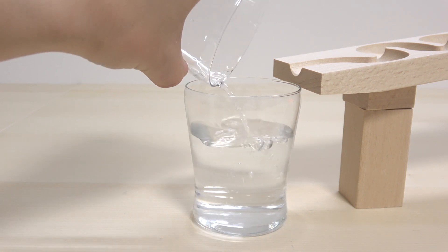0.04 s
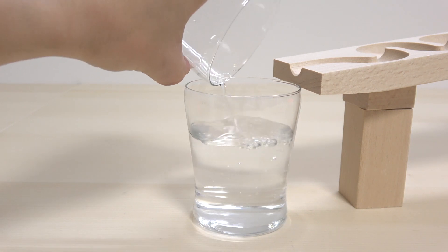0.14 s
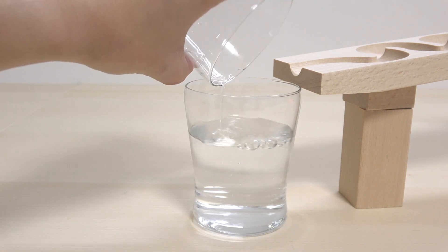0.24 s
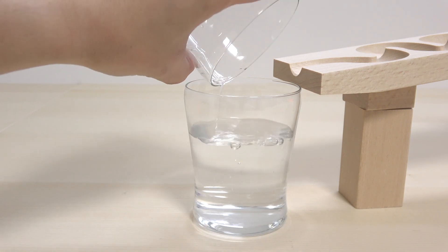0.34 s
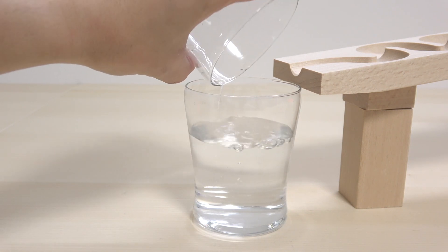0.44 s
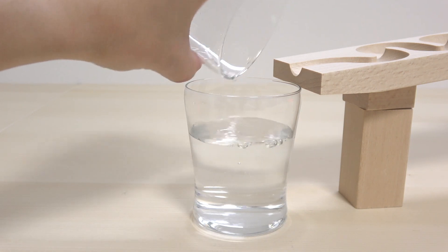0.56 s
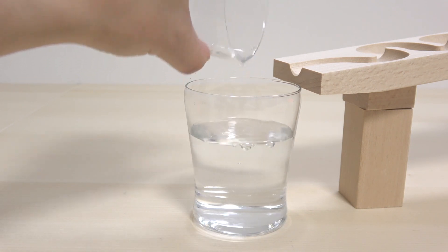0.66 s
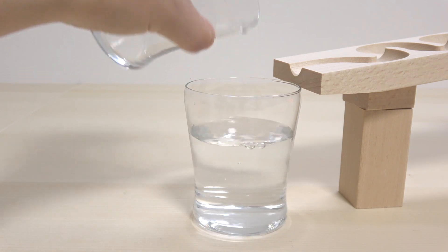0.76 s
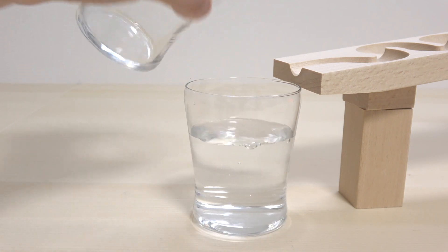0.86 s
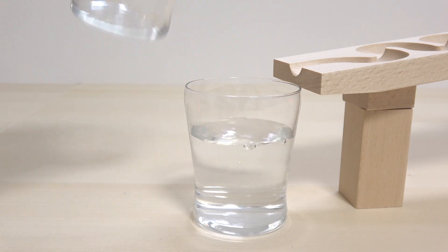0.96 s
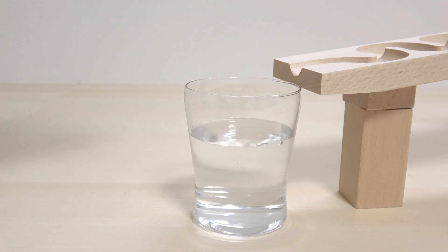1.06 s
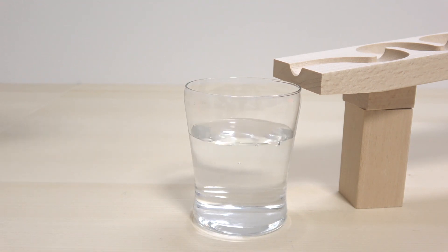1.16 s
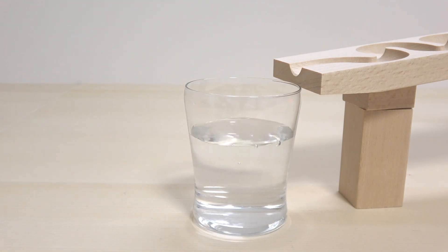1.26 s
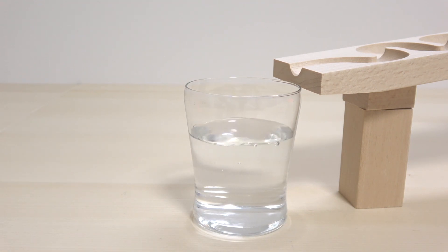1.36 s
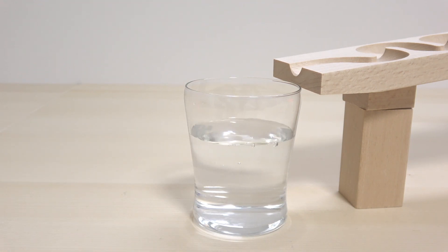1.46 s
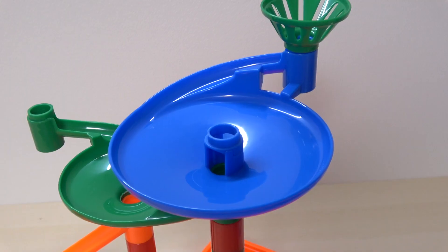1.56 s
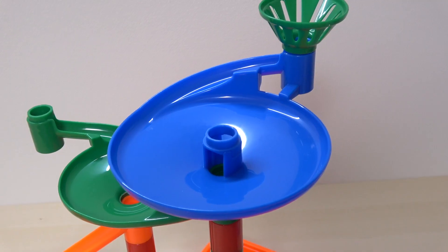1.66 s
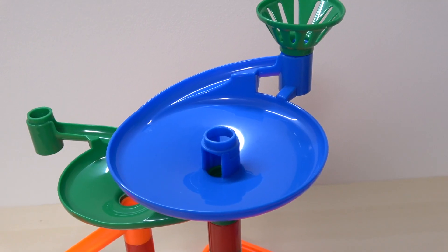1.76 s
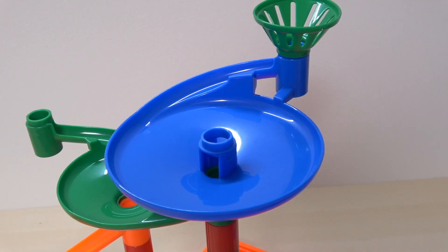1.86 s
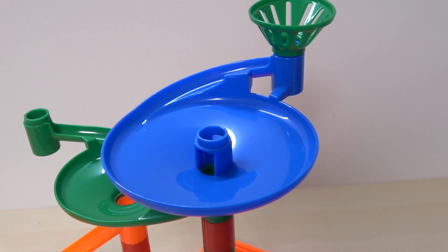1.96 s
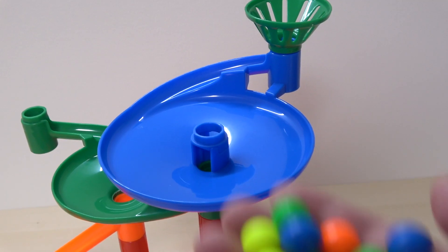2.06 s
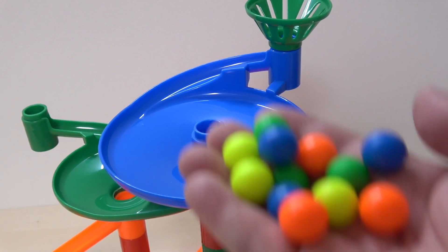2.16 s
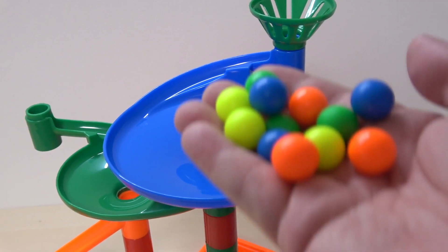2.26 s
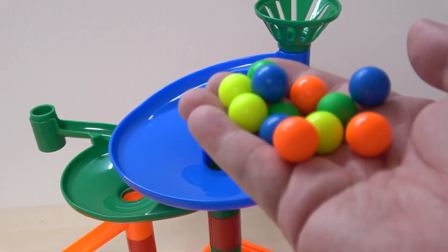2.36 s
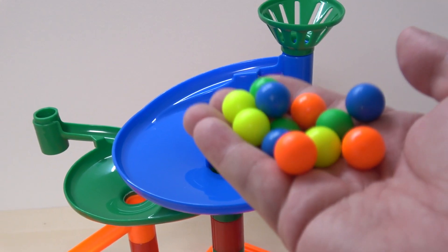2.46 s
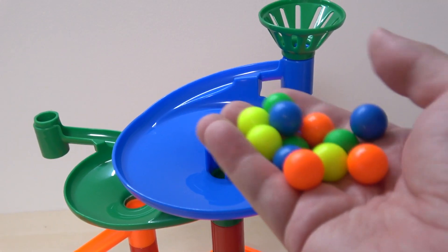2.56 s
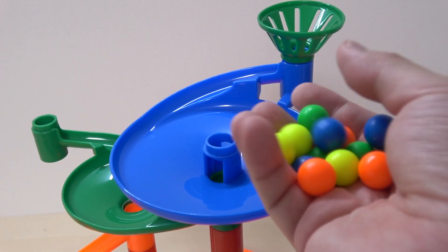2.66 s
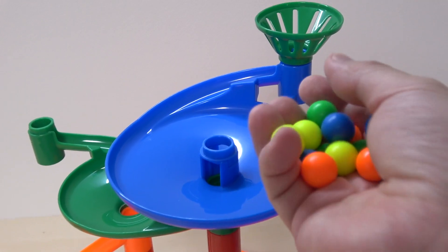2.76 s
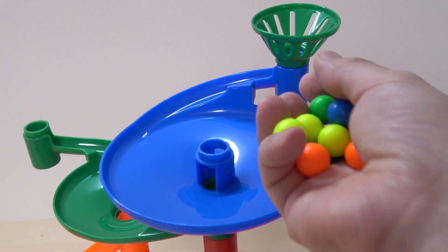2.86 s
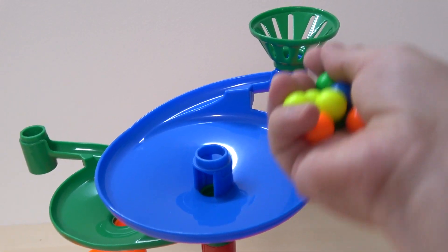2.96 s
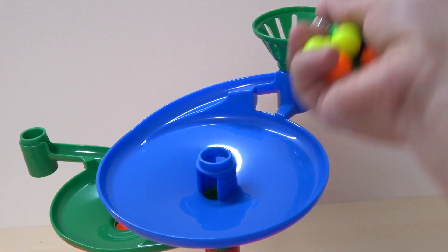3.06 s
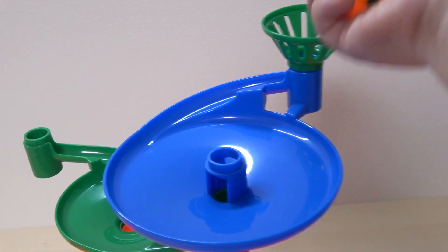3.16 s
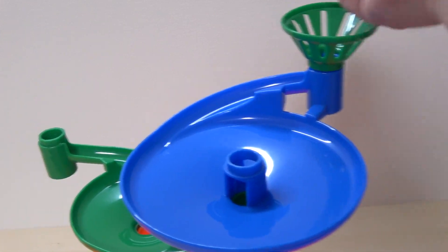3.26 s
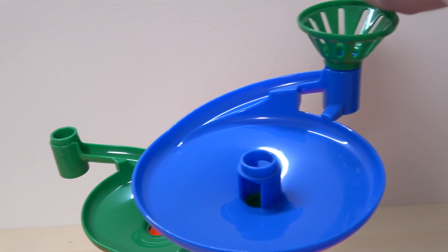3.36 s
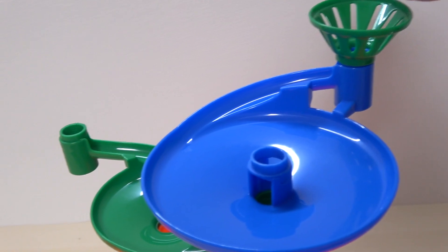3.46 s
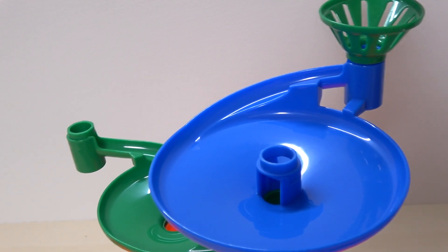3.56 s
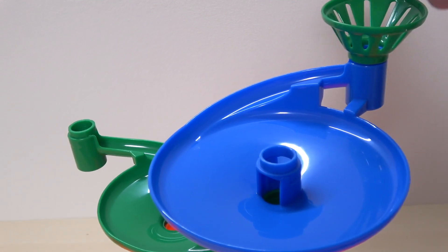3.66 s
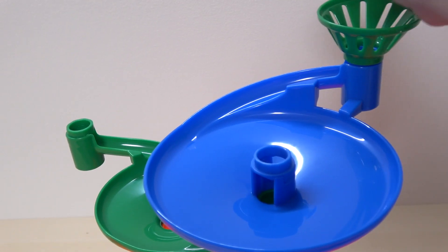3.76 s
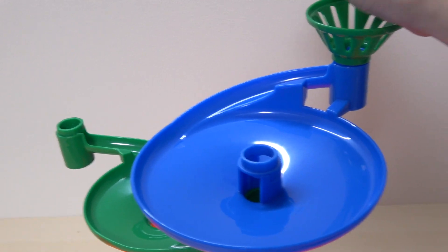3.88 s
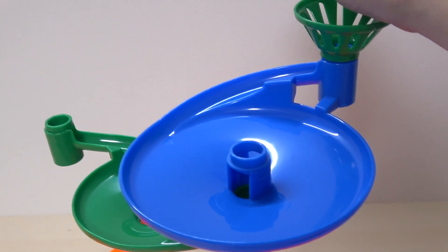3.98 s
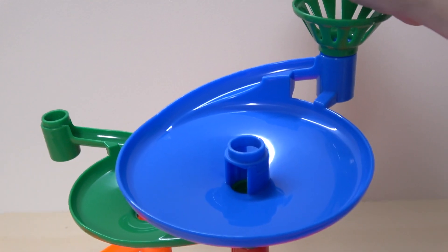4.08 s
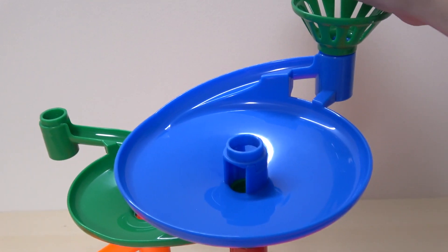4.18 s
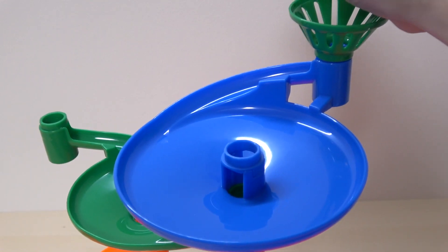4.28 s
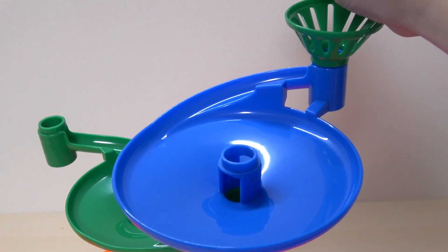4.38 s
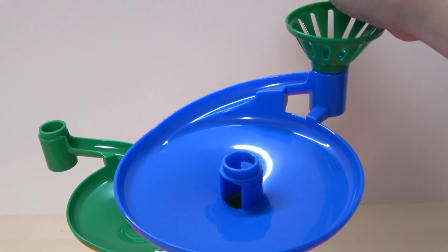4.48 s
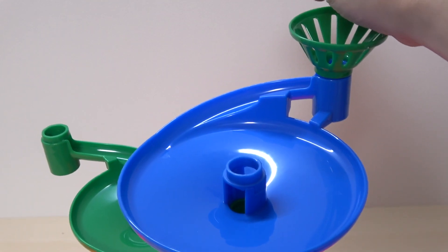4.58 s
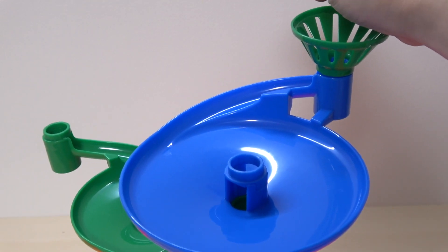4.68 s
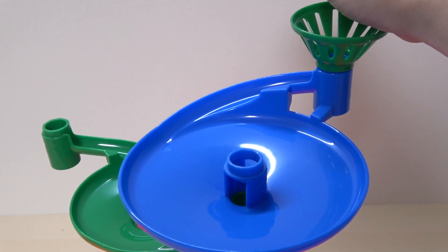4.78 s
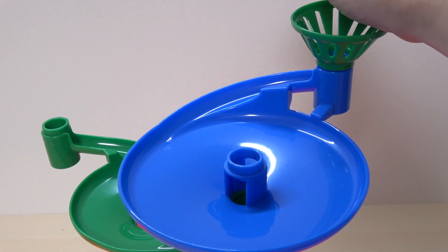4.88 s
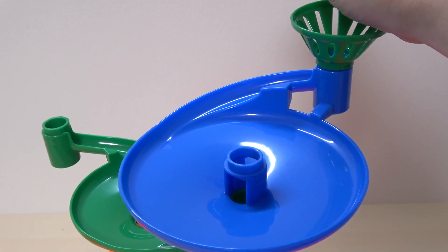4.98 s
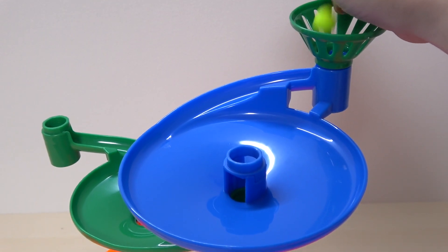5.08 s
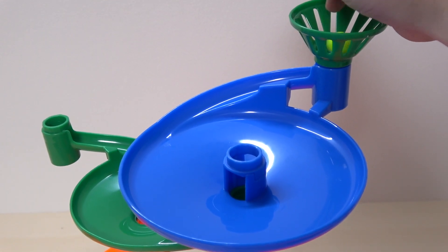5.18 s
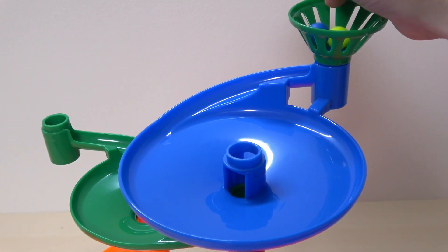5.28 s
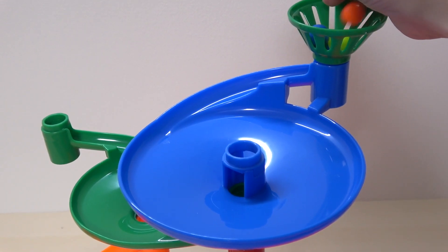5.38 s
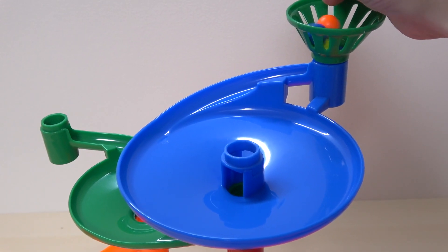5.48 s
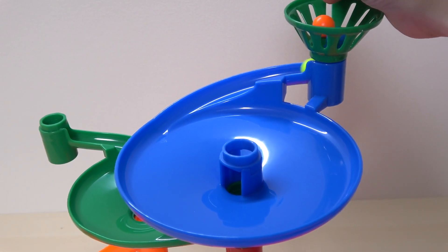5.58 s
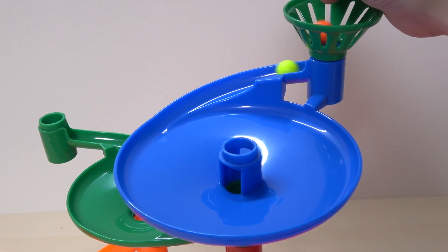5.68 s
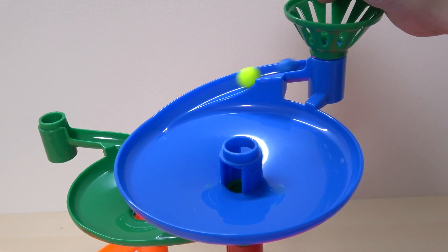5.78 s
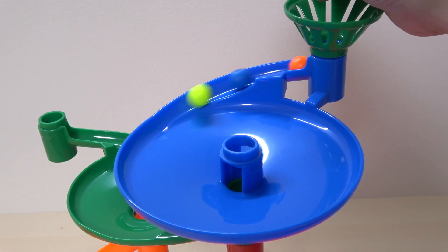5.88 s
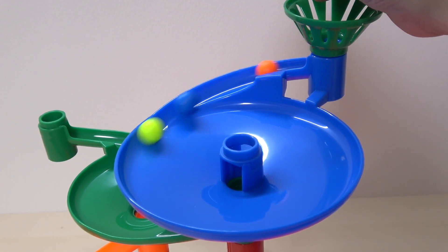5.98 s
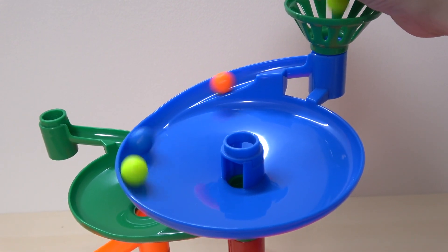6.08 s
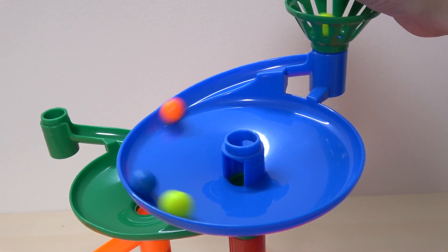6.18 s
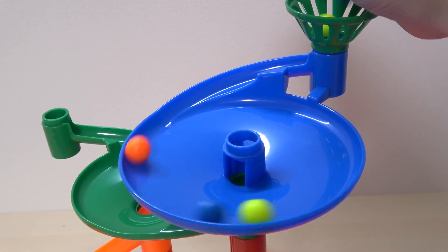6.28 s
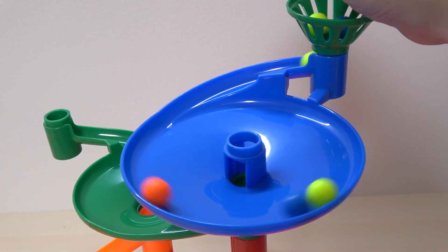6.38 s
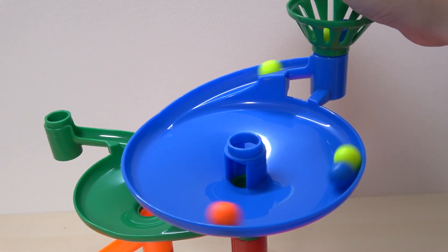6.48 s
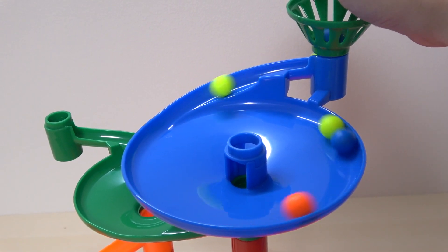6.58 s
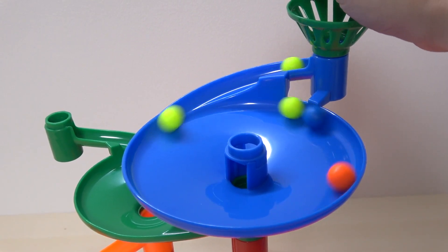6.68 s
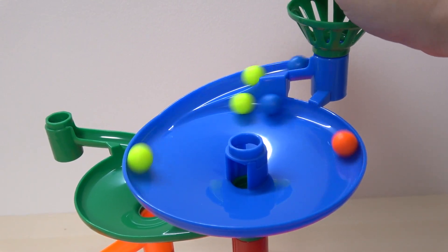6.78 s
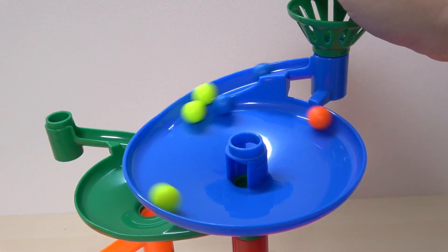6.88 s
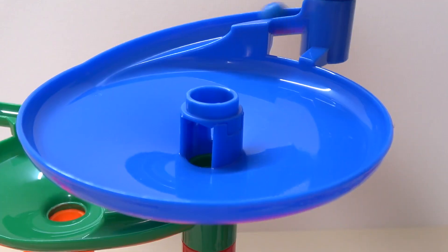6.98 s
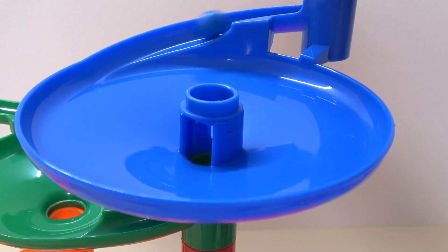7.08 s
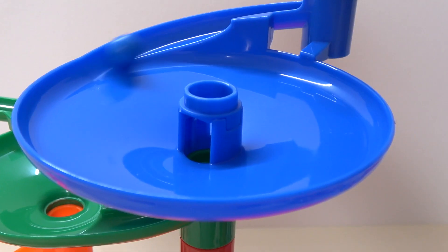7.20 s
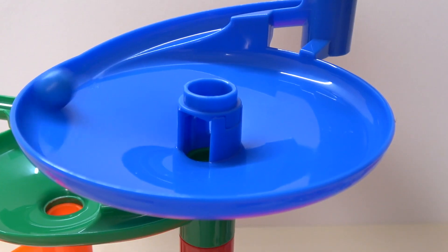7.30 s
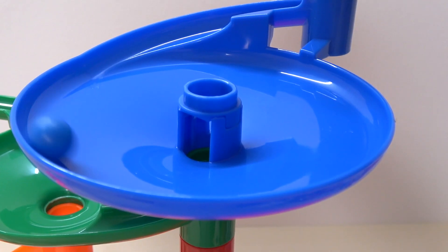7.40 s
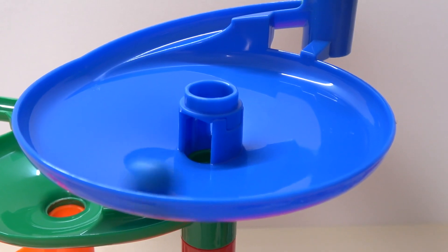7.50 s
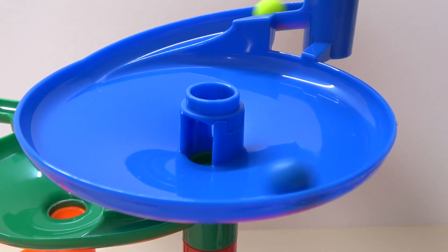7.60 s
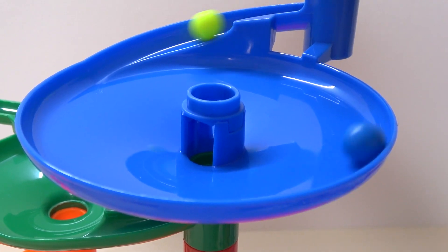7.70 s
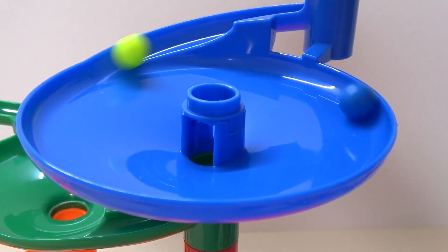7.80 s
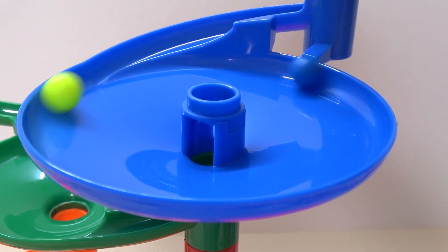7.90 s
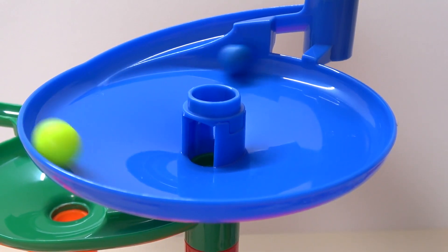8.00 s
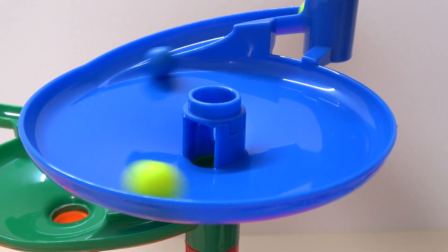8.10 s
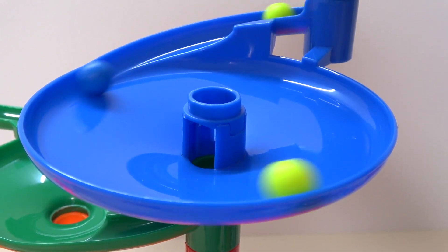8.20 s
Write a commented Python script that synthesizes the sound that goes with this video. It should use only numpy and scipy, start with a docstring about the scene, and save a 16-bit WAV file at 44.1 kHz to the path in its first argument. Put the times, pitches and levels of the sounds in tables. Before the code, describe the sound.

Last drips plink into a glass of water, then plastic balls click in a palm before clattering and rolling loudly round a plastic marble run.

```python
"""The last of some water drips into a glass: trapped bubbles ring, droplets patter, tiny bubbles burst.
Then, in a small quiet room, a low drone dies away and a handful of plastic balls click and rub in a palm.
Last, the balls drop into the funnel of a toy marble run, clatter down a chute and roll round a thin tray.
Each blow is a short burst that sets off the plastic's resonances; rolling is a stream of tiny blows.
"""
import sys
import numpy as np
from scipy import signal
from scipy.fft import rfft, irfft
from scipy.io import wavfile
from scipy.ndimage import uniform_filter1d, minimum_filter1d

SR = 44100
rng = np.random.default_rng(int(sys.argv[2]) if len(sys.argv) > 2 else 0)


def transcribe(signal):
    """Save signal, clipped to [-1, 1], as a 16-bit WAV file at the path in sys.argv[1]."""
    frames = np.atleast_2d(signal).T
    limited = np.clip(frames, -1, 1)
    pcm = np.round(limited * 32767).astype(np.int16)
    wavfile.write(sys.argv[1], SR, pcm)


N = 363825
TAPS = 16384  # length of the filters and single sounds (samples)
TIME, AGE = np.arange(N) / SR, np.arange(TAPS) / SR  # s
HZ = np.fft.rfftfreq(TAPS, 1 / SR)
RING_T60, ROOM_T60 = 0.086, 0.29  # time for plastic and room to fall by 60 dB (s)
LAG_S = .0007  # listed blows, clicks and pops sound this long after their times (s)


def amp(db):
    """Decibels to gain."""
    return 10 ** (np.asarray(db) / 20)


def evened(x):
    """Scales to an rms of one."""
    return x / np.sqrt(np.mean(x ** 2) + 1e-20)


def read(points, hz=HZ):
    """Reads a spectrum between its points, on a log-frequency axis."""
    f, value = np.transpose(points)
    return np.interp(np.log(hz + 1), np.log(f + 1), value)


def add(mix, s, sound):
    """Mixes a sound in at time s."""
    part = mix[max(round(s * SR), 0):][:len(sound)]
    part += sound[:len(part)]


def colour(x, db):
    """Filters with the given gain at each of HZ, never ahead of time, so its peaks ring on after a blow."""
    both_halves_db = np.concatenate([db, db[-2:0:-1]])
    log_gain = np.log(amp(both_halves_db))
    # the Hilbert transform finds the phase that packs the energy as early as possible
    response = np.fft.ifft(np.exp(np.conj(signal.hilbert(log_gain)))).real
    return signal.fftconvolve(x, response[:TAPS // 2])[:len(x)]


def peak(hz, width):
    """Power response of one resonance."""
    return 1 / (1 + (2 * (HZ - hz) / width) ** 2)


def dying(t60):
    """Countless modes or echoes dying together, with unit energy."""
    tail = rng.standard_normal(TAPS) * amp(-60 * AGE / t60)
    return tail / np.linalg.norm(tail)


def room(wet_db, echo=0.38):
    """Direct sound, two echoes from table and wall, and the blurred tail of the room."""
    response = amp(wet_db) * dying(ROOM_T60) + amp(wet_db - 15.0) * dying(0.15)
    response[0] += 1
    response[rng.integers(90, 150)] += echo
    response[rng.integers(200, 300)] += echo
    return response


def blow(crack=0.74, snap=0., wet_db=-4):
    """One contact: a crack, a snap, the short ring of the plastic at that spot, and the room."""
    response = dying(RING_T60) + snap * dying(0.013) + amp(wet_db) * dying(ROOM_T60)
    response[0] += crack
    return response


def bumps(per_s, spread_db, count=6):
    """A stream of small contacts of uneven size at several spots."""
    size = amp(spread_db * np.minimum(rng.exponential(1, (count, N)), 3))
    hit = rng.random((count, N)) < per_s / count / SR
    return sum(signal.oaconvolve(train, blow())[:N] for train in size * hit)


def clicks(rows, spectrum, width_hz, level_db, wet_db, steepness, narrowing=0.17):
    """Contacts only a few cycles long, each followed by the room; gentle ones are narrower in tone."""
    out = np.zeros(N)
    loudest = max(row[1] for row in rows)
    for s, db, hz in rows:
        width = width_hz * amp(narrowing * (db - loudest))
        tone_db = read(spectrum) + steepness * np.log10(peak(hz, width))
        click = colour(room(wet_db), tone_db)
        add(out, s + LAG_S, amp(db + level_db) * click / abs(click).max())
    return out


# colour of the still air round the glass and round the run: f/Hz, relative level/dB
GLASS_AIR = [(20, -16), (60, 1), (95, -11), (125, 2), (175, -8.5), (220, 2), (265, -7.5), (315, 2.5),
             (400, -9), (600, -6.5), (1000, -11.5), (1400, -23), (4000, -29.5), (6500, -28.5), (16000, -32)]
TOY_AIR = [(20, -11), (62, 9.5), (85, -6), (115, 1), (160, -5.5), (230, -3), (430, -6.5), (620, 2),
           (720, -4), (850, -1.5), (1050, -5.5), (1450, -22), (4800, -29), (6500, -26), (16000, -30)]


def air(glass_db=-56.5, toy_db=-55.5):
    """Steady noise of the still air, a little different in the two places."""
    moved = np.clip((TIME - 1.56) / 0.033, 0, 1)
    by_glass = amp(glass_db) * evened(colour(rng.standard_normal(N), read(GLASS_AIR)))
    by_toy = amp(toy_db) * evened(colour(rng.standard_normal(N), read(TOY_AIR)))
    return np.sqrt(1 - moved) * by_glass + np.sqrt(moved) * by_toy


# air bubbles trapped by the last drips: t/s, starting f/Hz, peak level/dB, time to fall by 60 dB/s
BUBBLES = [(0.0, 1410, -35.5, 0.02), (0.016, 1234, -41, 0.14), (.028, 2970, -41, .05),
           (.044, 3100, -36, 0.024), (0.045, 1216, -43, 0.11), (0.07, 1440, -40, 0.058),
           (.071, 2880, -42, .025), (.072, 2310, -45.5, .09), (0.079, 1510, -35, 0.018),
           (.362, 3700, -58, 0.063), (0.363, 3330, -55, 0.022), (.388, 4900, -57, .02)]


def drips(rise=1.35, wet_db=-7):
    """Each trapped bubble rings and rises in pitch as it nears the surface."""
    out = np.zeros(N)
    for s, hz, db, t60 in BUBBLES:
        tone = np.sin(2 * np.pi * hz * AGE * (1 + rise * AGE))
        ring = tone * amp(-60 * AGE / t60) * (1 - np.exp(-AGE / 0.00024))  # quick, soft start
        heard = signal.fftconvolve(ring, room(wet_db, echo=0.13))[:TAPS]
        add(out, s, amp(db) * heard / abs(heard).max())
    return out


# colour of the droplets and spray: f/Hz, relative level/dB
SPLASH = [(200, -5), (900, -12), (1400, 0), (2000, -12), (3000, -13), (3900, -16), (6000, -10), (8000, -20),
          (11000, -16), (16000, -29)]


def trickle(stream_db=-48, stream_fade_db_per_s=105, spray_db=-66, spray_fade_db_per_s=24):
    """The thin stream breaks into droplets and fades fast; a fine spray lingers on the water."""
    stream = amp(stream_db - stream_fade_db_per_s * TIME)
    spray = amp(spray_db - spray_fade_db_per_s * TIME)
    return evened(colour(bumps(400, 5.6), read(SPLASH))) * (stream + spray)


# the clearest tiny bubbles bursting: t/s, level/dB (before level_db), f/Hz
POPS = [(0.0613, -36, 5740), (0.0707, -34.5, 5770), (0.2074, -44, 5800), (0.2568, -42, 7350),
        (0.2923, -41, 5500), (0.3267, -41, 5450), (0.3885, -43, 4780), (0.4564, -47, 8300),
        (0.619, -42, 7040), (0.655, -38, 7600), (0.7756, -46, 8720), (0.8525, -43, 6620),
        (1.0883, -38.5, 9000)]
# colour of the bursts: f/Hz, relative level/dB
POP_COLOUR = [(500, -30), (2500, -3), (5500, 4), (11000, 2), (16000, -2)]


def pops():
    """Tiny bubbles burst, each a click only a few cycles long."""
    return clicks(POPS, POP_COLOUR, width_hz=1600, level_db=-1.5, wet_db=-3, steepness=8.1)


def hum(hz, width_hz):
    """A low, narrow, wavering tone, made from filtered noise."""
    return evened(colour(rng.standard_normal(N), 20 * np.log10(peak(hz, width_hz))))


def low_sounds(drone_db=-57, drone_start_s=1.51, drone_rise_s=.04, drone_fade_db_per_s=11, nudge_db=-56):
    """A low drone that dies away, and a soft nudge of the hand on the funnel."""
    age = np.maximum(TIME - drone_start_s, 0)
    drone = hum(108, 7) * np.minimum(age / drone_rise_s, 1) * amp(drone_db - drone_fade_db_per_s * age)
    nudge = hum(317, 50) * amp(nudge_db) * np.exp(-((TIME - 3.65) / 0.081) ** 2)
    return drone + nudge


# balls clicking together in the hand: t/s, peak level/dB, f/Hz
HAND_CLICKS = [(2.2402, -46, 3220), (2.289, -55, 3330), (2.5952, -31, 3500), (2.6762, -21, 5130),
               (2.6837, -19.5, 3680), (2.7058, -12, 6800), (2.7212, -14.5, 4200), (2.7314, -20.5, 3600),
               (2.808, -31, 2530), (2.8254, -29, 2200), (2.852, -16, 4570), (2.9464, -11.5, 3900),
               (2.9864, -6, 5400), (3.1001, -25, 2640), (3.1141, -7, 6000), (3.1895, -17, 4600),
               (3.3642, -42, 1550), (3.4875, -47, 2880), (3.674, -44.5, 2650), (3.7189, -43, 2780),
               (5.0436, -51, 2600)]
# colour of ball against ball: f/Hz, relative level/dB
BALL_COLOUR = [(200, -38), (800, -9.5), (1400, -2.5), (3000, -0.5), (6200, -2), (9000, -8), (12000, -18),
               (16000, -25)]
REBOUND_S, REBOUND_DB, REBOUND_PITCH = 0.0084, -13, 0.67  # typical delay (s), level (dB), share of pitch


def handful():
    """Balls click and rub in the hand; each click has a softer, duller rebound."""
    delays = REBOUND_S * rng.uniform(.5, 1.4, len(HAND_CLICKS))
    rebounds = [(s + delay, db + REBOUND_DB, hz * REBOUND_PITCH)
                for (s, db, hz), delay in zip(HAND_CLICKS, delays)]
    clicking = clicks(HAND_CLICKS + rebounds, BALL_COLOUR, width_hz=2040, level_db=0.0, wet_db=-4.5,
                      steepness=10.2, narrowing=0.23)
    return clicking + rubs()


# balls rubbing in the palm, and in the last row as they leave the hand:
# middle t/s, spread of the swell/s, level/dB (before the room)
RUBS = [(2.657, 0.016, -56), (2.832, 0.0046, -43), (2.915, 0.0076, -54), (2.961, .008, -46),
        (2.985, 0.0041, -37), (3.118, 0.012, -40.5), (3.378, 0.019, -63), (3.6, 0.1, -76.5),
        (5.141, 0.006, -28.5)]


def rubs(hz=2600, width_hz=1500):
    """Dense tiny slips as balls rub in the palm, and once as they leave the hand: noise in short swells."""
    level = sum(amp(db) * np.exp(-((TIME - s) / length) ** 2 / 2) for s, length, db in RUBS)
    tone_db = read(BALL_COLOUR) + 10 * np.log10(peak(hz, width_hz))
    slips = level * evened(colour(rng.standard_normal(N), tone_db))
    return signal.oaconvolve(slips, room(-1))[:N]


# resonances of the plastic run, and two dips (negative height): f/Hz, width/Hz, height/dB
TRAY_PEAKS_AND_DIPS = [(111.4, 13, 15), (151, 6.9, 12), (217.8, 5, 16.5), (317.3, 7, 14), (421, 37, 8.5),
                       (537.2, 9.2, 13.5), (618, 30, 12.5), (740.3, 7.3, 18.5), (776, 6.7, 16.5),
                       (1024, 26, 5), (1099, 12, 14), (1234, 44, 9), (1272, 28, 13.5), (1337, 66, 7),
                       (1592, 4.7, 12), (1602, 9.9, 16.5), (1660, 10.4, 14), (1818, 34, 8), (1850, 18, 8),
                       (2252, 7.4, 12.5), (2475, 49, 9), (2898, 64, 7), (3212, 19, 10.5), (3495, 33, 7.5),
                       (3770, 7, 10.5), (3630, 23, -18), (4200, 48, -9), (5960, 410, 5.5), (7190, 410, 2.5)]


def tray_resonance(ripple_db=1.0):
    """The resonances of the run, two dips, and a ripple of crowded weak modes in the treble, in dB."""
    shape = sum((amp(db) ** 2 - 1) * peak(hz, width) for hz, width, db in TRAY_PEAKS_AND_DIPS)
    weak = evened(signal.fftconvolve(rng.standard_normal(len(HZ)), np.hanning(45), "same"))
    return 10 * np.log10(np.maximum(1 + shape, .1)) + ripple_db * weak * np.clip(HZ / 4000, 0, 1)


def resonate(x, hz, width):
    """A resonance that follows the curve hz: shift that note to 0 Hz, smooth, and shift back."""
    turn, r = np.exp(2j * np.pi * np.cumsum(hz) / SR), np.exp(-np.pi * width / SR)
    return 2 * (turn * signal.lfilter([1 - r], [1, -r], x / turn + 1e-18)).real


def wandering(hz, swing_hz, per_s):
    """A note that drifts as the balls move to new places on the tray."""
    places = 2 * rng.random(size=256) - 1
    return hz + swing_hz * np.interp(TIME * per_s, np.arange(len(places)), places)


def circling(x, delay_s=0.00337, swing=0.338, turns_per_s=1.05, echo=0.16):
    """The path of the echo from the table lengthens and shortens as the balls go round."""
    delay = delay_s * (1 - swing * np.cos(2 * np.pi * turns_per_s * (TIME - 7.1)))
    return evened(x + echo * np.interp(TIME - delay, TIME, x))


def dulled(x, share, corner_hz=1750):
    """Takes away a share of the treble, as a slow ball does."""
    hz = np.fft.rfftfreq(N, 1 / SR)
    treble = irfft(rfft(x) * hz ** 8 / (hz ** 8 + corner_hz ** 8), N)
    return x - share * treble


def dips(dip_s=0.0044, depth=0.64):
    """The rolling dips for some ms just before each drop or ball-on-ball hit, as under a look-ahead limiter."""
    level = np.ones(N)
    for s, *_ in DROPS + COLLISIONS:
        add(level, s - 0.81 * dip_s, -depth * np.hanning(round(2.1 * dip_s * SR)))
    return np.clip(level, 0, 1)


# balls rolling round the tray: t/s, level/dB (shared by the layers), note of the tray under them f/Hz
ROLLING = [(5.14, -17.5, 1490), (5.19, -28.5, 1410), (5.7, -28.5, 1284), (5.91, -25, 1326),
           (6.06, -23, 1303), (6.2, -20.5, 1277), (6.4, -23, 1306), (6.59, -21.5, 1280),
           (6.78, -22.5, 1310), (6.95, -19.5, 1330), (7.14, -34.5, 1190), (7.21, -26.5, 1290),
           (7.38, -27, 1250), (7.68, -27, 1355), (7.84, -21.5, 1306), (8.0, -28.5, 1280),
           (8.14, -26.5, 1240), (8.25, -24.5, 1350)]
# colour under the resonances for soft rolling contact, and for a hard blow: f/Hz, relative level/dB
SOFT = [(30, -48), (100, -38.5), (250, -14), (400, -6), (650, -10.5), (900, -3), (1250, -4), (1500, -13),
        (2100, -4.5), (3000, -6), (5000, -25.5), (9000, -30), (16000, -102)]
HARD = [(30, -22), (70, -13.5), (250, -9.5), (450, -5), (880, -7), (1250, -7), (2050, -6.5), (3000, -7),
        (4300, -2.5), (5400, -10.5), (9300, -22), (11000, -28), (12600, -27.5), (16000, -46.5)]
HOLLOW_HZ = 728  # middle of a lower, hollow note of the tray


def rolling(tray_db, roll_db=-2.5, sing_db=-3, hollow_db=-14.5, chatter_db=-11.0, chatter_growth=1.63,
            dulling=0.51):
    """Balls rumble on the tray, which sings under them; fast ones are brighter and chatter on its rim."""
    s, *controls = np.transpose(ROLLING)
    level_db, sing_hz = (np.interp(TIME, s, control) for control in controls)
    slowed_db = level_db - level_db.max()  # 0 at the loudest, falling as the balls slow
    released = np.clip((TIME - 5.138) / .006, 0, 1)

    rumble = circling(colour(bumps(450, 3.0), read(SOFT) + tray_db))
    rumble = dulled(rumble, 1 - amp(dulling * slowed_db))
    # each note passes its resonance twice, which makes it purer
    sing_hz = wandering(sing_hz, swing_hz=55, per_s=24)
    sing = evened(resonate(resonate(bumps(500, 2.4), sing_hz, 200), sing_hz, 200))
    hollow_hz = wandering(HOLLOW_HZ, swing_hz=62.6, per_s=11)
    hollow = evened(resonate(resonate(bumps(350, 1.53), hollow_hz, 82), hollow_hz, 82))
    soft = (amp(roll_db) * rumble + amp(sing_db) * sing + amp(hollow_db) * hollow) * amp(level_db)

    rim_db = chatter_db + level_db.max() + chatter_growth * slowed_db
    chatter = evened(colour(bumps(160, 0.7), read(HARD) + tray_db)) * amp(rim_db)
    return released * dips() * (soft + chatter)


def strike(tray_db, levels_db, note_hz, note_db, note_width_hz, snap, crack_db, body_hz=1230,
           body_spread=0.54, body_ring_db=6.5):
    """One blow rings the run, at given levels of thud, body, clack and tick; every spot has its own notes."""
    # four bands from low to high: thud, body, clack, tick
    below = [1 / (1 + (HZ / hz) ** 8) for hz in (950, 2050, 6500)]
    zones = np.diff([0 * HZ, *below, 0 * HZ + 1], axis=0)
    spot_body_hz = body_hz * (1 + body_spread * rng.random() ** 2)
    notes_db = body_ring_db * peak(spot_body_hz, 310) + note_db * peak(note_hz, note_width_hz)
    # modes with a node (a point at rest) at the spot stay quiet
    nodes_db = 1.56 * np.cos(2 * np.pi * (np.sqrt(HZ) / rng.uniform(3.3, 6.82) + rng.random()))
    shell_db = read(HARD) + tray_db + notes_db + nodes_db
    contact = blow(crack=0.32, snap=snap)
    # what each band holds in its first 20 ms sets the gain it needs
    held = irfft(rfft(colour(contact, shell_db)) * zones)[:, :SR // 50].std(axis=1)
    tone_db = shell_db + 20 * np.log10((amp(levels_db) / held) @ zones)
    sound = colour(contact, tone_db)
    # the first crack comes straight from the point of contact
    crack = colour(signal.unit_impulse(1024), tone_db - 14 * below[1])
    add(sound, 0, amp(crack_db) * crack / abs(crack).max())
    return sound


# balls dropped into the funnel, which then swirl over its ribs:
# t/s, level/dB, clack relative level/dB, clack f/Hz, swirl level/dB
DROPS = [(5.141, -18.5, 5.5, 2900, -18.5), (5.1943, -26.5, -16, 6400, -43), (5.3005, -26, 12.5, 3250, -12),
         (5.3134, -17.5, -1, 4470, -26), (5.4176, -18, -9.5, 5400, -46)]


def drops(tray_db, thud_db=-2.5, body_db=0.0, tick_db=-1, crack_db=-1):
    """A falling ball shakes the whole tower: a deep thud under a hard tick."""
    out = np.zeros(N)
    for s, db, clack, hz, _ in DROPS:
        levels_db = db + np.array([thud_db, body_db, clack, tick_db])
        hit = strike(tray_db, levels_db, hz, note_db=4.5, note_width_hz=380, snap=0.67,
                     crack_db=db + crack_db, body_hz=1530)
        add(out, s + LAG_S, hit)
    return out


# notes of the funnel's ribs: f/Hz, width/Hz (before the squaring below), level/dB (before summing)
FUNNEL_MODES = [(1586, 94, -2), (1690, 52, -9), (1867, 130, -3)]
SWIRL_RISE_S, SWIRL_FADE_DB_PER_S = 0.0038, 224


def funnel():
    """The ribs of the funnel ring as each dropped ball swirls over them and sinks."""
    ribs = sum(amp(db) * peak(hz, width) for hz, width, db in FUNNEL_MODES)
    swirl = np.zeros(N)
    for s, *_, db in DROPS:
        add(swirl, s, np.minimum(AGE / SWIRL_RISE_S, 1) * amp(db - SWIRL_FADE_DB_PER_S * AGE))
    # 20 log10 of a power response squares it, so the notes get narrower
    return evened(colour(bumps(400, 2.2), 20 * np.log10(ribs))) * swirl


# spells of lighter bounces as balls rattle down the chute:
# start t/s, length/s, middle level/dB, body relative level/dB (before body_db), middle clack f/Hz
RATTLES = [(5.21, .09, -31.5, 0, 3830), (5.321, 0.059, -23.5, -4.5, 3250), (5.447, .1, -27, -3, 3540),
           (5.562, .17, -22, -5, 3900), (5.745, 0.14, -16.5, -10, 3850), (6.161, 0.17, -27, 0, 3470),
           (6.355, .07, -15.5, -3.5, 4800), (6.432, .06, -22, -5.5, 4030), (6.491, 0.13, -28.5, -4, 3180),
           (6.619, 0.16, -16, -6.5, 4370), (6.964, .1, -25, -13, 2700), (7.437, 0.061, -14.5, -7, 3250),
           (7.499, 0.069, -22.5, -10, 3300), (7.845, .13, -28, 1.5, 3100), (8.023, .06, -22, -2, 3330),
           (8.113, .06, -19.5, -5, 3620)]
BOUNCE_S, BOUNCE_SPREAD_DB = .012, 2.2  # mean time between bounces (s), spread of their strength (dB)
NOTE_SPREAD = .25  # how far the clack note differs from spot to spot (share)


def rattles(tray_db, thud_db=-15, thud_follows=0.47, body_db=-2.0, clack_db=-7, tick_db=-21,
            tick_db_per_octave=10, crack_db=-2, count=3):
    """A ball bounces unevenly between a few spots; spells with a higher clack have a harder tick."""
    out = np.zeros(N)
    for start, length, db, body, note_hz in RATTLES:
        tick = tick_db + tick_db_per_octave * np.log2(note_hz / 3700)
        levels_db = np.array([thud_db + thud_follows * body, body + body_db, clack_db, tick])
        spot_notes_hz = note_hz * (1 + NOTE_SPREAD * (2 * rng.random(count) - 1))
        spots = [strike(tray_db, levels_db, hz, note_db=6.5, note_width_hz=290, snap=0.71,
                        crack_db=crack_db) for hz in spot_notes_hz]
        delays = BOUNCE_S * (np.arange(32) + rng.random(size=32))
        sizes = amp(db + BOUNCE_SPREAD_DB * rng.standard_normal(len(delays)))
        for k, delay in enumerate(delays[delays < length]):
            add(out, start + delay, sizes[k] * spots[k % count])
    return out


# single knocks against the walls of chute and tray, from loud clacks to faint lone taps:
# t/s, level/dB, body relative level/dB, tick relative level/dB (before tick_db), clack f/Hz
KNOCKS = [(5.2153, -19.5, -11, -14, 3970), (5.243, -25.5, -4, -26, 3840), (5.352, -18, -9.5, -23, 3550),
          (5.4465, -15, -3, -11.5, 4130), (5.496, -21, -5, -24, 3450), (5.5287, -16.5, -3.5, -20, 3470),
          (5.5571, -11.5, -8, -20, 4350), (5.5897, -18.5, -4.5, -16, 4300), (5.6165, -7, -13, -16.5, 4130),
          (5.726, -7, -9, -11.5, 4500), (5.7645, -10.5, -9, -21, 3900), (5.8229, -14.5, -10, -17, 3750),
          (5.8729, -14, -21, -26, 4670), (5.9, -13.5, -29, -16.5, 2440), (5.9391, -26, -5, -22, 2220),
          (6.2043, -19.5, 2.5, -10.5, 3800), (6.2767, -18, -7, -18, 3400), (6.3111, -20, -6, -19, 2890),
          (6.3758, -13.5, -19, -22, 4870), (6.3985, -19, -1.5, -14, 3440), (6.4167, -16.5, -7, -19, 4640),
          (6.4338, -13.5, -18, -9.5, 2240), (6.462, -19.5, -6.5, -10, 2260), (6.5829, -19, -3, -20, 3440),
          (6.611, -14, -9, -12, 4020), (6.6258, -18, -5.5, -24, 3150), (6.6607, -8.5, -7, -9, 3350),
          (6.7033, -9.5, -7.5, -11.5, 4480), (6.7715, -10, -8.5, -11.5, 2330),
          (6.998, -18.5, -5.5, -12, 3020), (7.032, -19, -9, -12.5, 2410), (7.0592, -17.5, -9, -22, 2400),
          (7.2813, -34.5, -9, -17, 2800), (7.32, -35, 1.5, -19, 2600), (7.382, -40, -6, -11, 2310),
          (7.45, -11, -14, -15.5, 3200), (7.4839, -9, -13, -17.5, 3540), (7.5243, -19.5, -7.5, -28, 4170),
          (7.5715, -11, -15, -19, 3320), (7.5971, -17.5, -15, -20, 3240), (7.8613, -12.5, -14, -16, 3580),
          (7.878, -15.5, -20, -17, 3160), (7.9138, -20, -5, -13, 3470), (8.0023, -20, -2.5, -20, 3200),
          (8.02, -13, -7, -20, 3340), (8.078, -18, -7, -19, 3360), (8.1282, -16.5, -16, -18, 4060),
          (8.175, -17, -12, -18, 4270)]


def knocks(tray_db, thud_db=-15, thud_follows=.45, clack_db=-5, tick_db=-1.5, crack_db=0, hard_db=-8,
           soft_db=-24):
    """Ball on wall: a clack, with more body and thud where the plastic gives, more snap where it is stiff."""
    out = np.zeros(N)
    for s, db, body, tick, hz in KNOCKS:
        hardness = np.interp(tick, [soft_db, hard_db], [0, 1])
        levels_db = db + np.array([thud_db + thud_follows * body, body, clack_db, tick + tick_db])
        hit = strike(tray_db, levels_db, hz, note_db=5.5 + 3.6 * hardness, note_width_hz=840,
                     snap=.35 + .5 * hardness, crack_db=db + crack_db)
        add(out, s + LAG_S, hit)
    return out


# balls running into each other on the run, with a bright ring: t/s, level/dB, f/Hz
COLLISIONS = [(6.1449, -14, 4880), (6.345, -24, 5060), (6.354, -18, 5600), (6.942, -30.5, 5370),
              (7.181, -33.5, 3350), (7.4322, -18.5, 4540), (7.804, -14, 4800), (8.111, -20.5, 5000)]


def collisions(tray_db, thud_db=-19, body_db=-7, clack_db=-5.5, tick_db=-8.0, crack_db=3):
    """Ball on ball: a hard tick and a narrow, bright ring, with little weight."""
    out = np.zeros(N)
    for s, db, hz in COLLISIONS:
        levels_db = db + np.array([thud_db, body_db, clack_db, tick_db])
        hit = strike(tray_db, levels_db, hz, note_db=12.5, note_width_hz=240, snap=0.99,
                     crack_db=db + crack_db)
        add(out, s + LAG_S, hit)
    return out


# stereo width of the sources: f/Hz, side against middle level/dB (before side_db)
WIDTH = [(60, -13), (125, -25), (250, -24.5), (500, -19), (1000, -15), (2300, -35), (4200, -32.5),
         (8000, -15), (15000, -15)]
# stereo width of the air: f/Hz, side against middle level/dB
AIR_WIDTH = [(60, -21.5), (110, -14), (200, -14), (380, -8), (700, -12), (1290, -7), (2380, -9), (4400, -8),
             (8120, 2), (15000, -9)]
# lean to one side: f/Hz, left against right level/dB
LEAN = [(60, 0), (110, 4), (200, 0.5), (380, -0.5), (700, -2), (1290, -1), (2380, 0.5), (4400, -1),
        (8120, -0.5), (15000, -0.5)]


def scene(side_db=-1.5):
    """All sources reach two closely spaced microphones almost alike."""
    tray_db = tray_resonance()
    water = drips() + trickle() + pops()
    hits = drops(tray_db) + rattles(tray_db) + knocks(tray_db) + collisions(tray_db)
    near = water + low_sounds() + handful() + rolling(tray_db) + funnel() + hits
    # reflections arrive from the sides with scattered phase
    scatter = dying(0.017)
    scatter = colour(scatter, -20 * np.log10(abs(rfft(scatter)) + 0.08))  # evened out in colour
    sideways = signal.oaconvolve(near, scatter)[:N]
    side = colour(sideways, read(WIDTH) + side_db) + colour(air(), read(AIR_WIDTH))
    mid = near + air()
    return np.array([colour(mid + side, read(LEAN) / 2), colour(mid - side, -read(LEAN) / 2)])


EDGE_HZ = 16100  # top of the band


def record(dry, ceiling_db=-4, recovery_db_per_s=300):
    """A look-ahead limiter ducks just before each hard hit and soon recovers; then the band limit."""
    over_db = np.maximum(20 * np.log10(abs(dry).max(axis=0) + 1e-9) - ceiling_db, 0)
    fall = TIME * recovery_db_per_s
    gain = amp(fall - np.maximum.accumulate(over_db + fall))
    gain = uniform_filter1d(minimum_filter1d(gain, size=240), size=120)  # early and smooth
    low_pass = signal.firwin(401, EDGE_HZ, window=("kaiser", 9), fs=SR)
    return signal.oaconvolve(dry * gain, low_pass[None], "same")


dry = scene()
out = record(dry)
transcribe(out)
```